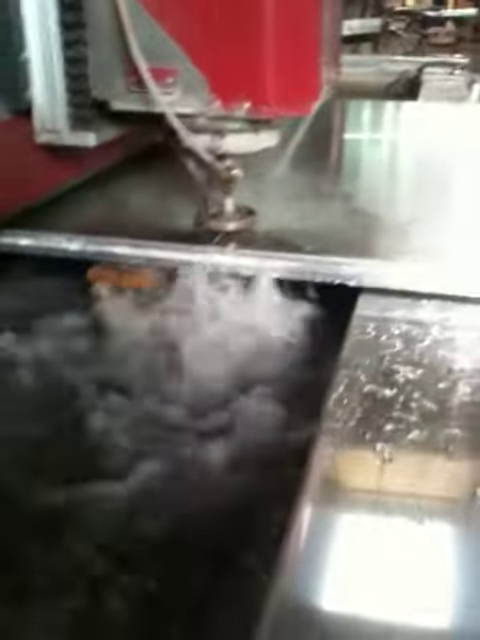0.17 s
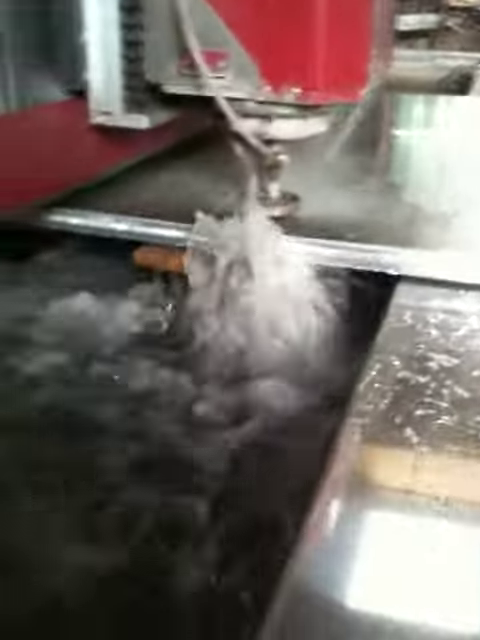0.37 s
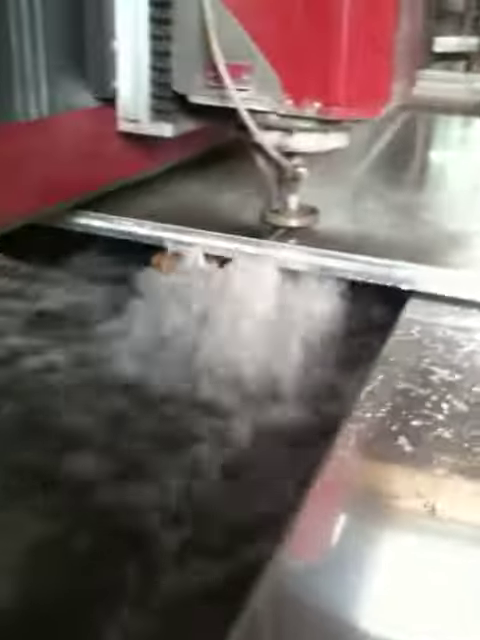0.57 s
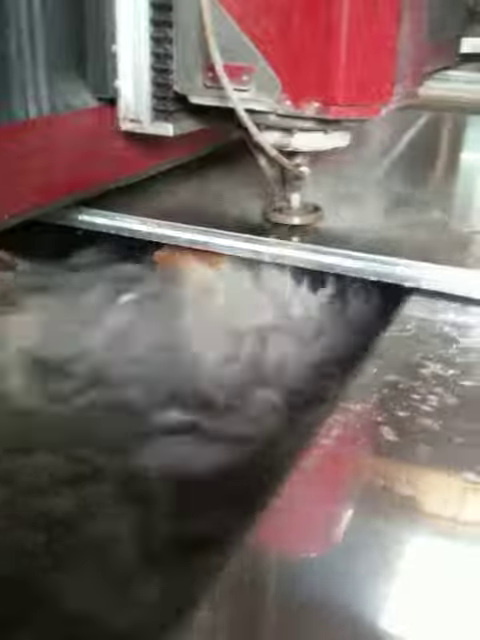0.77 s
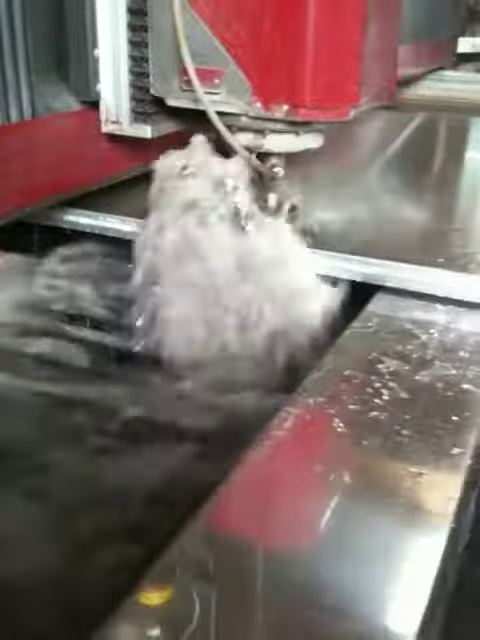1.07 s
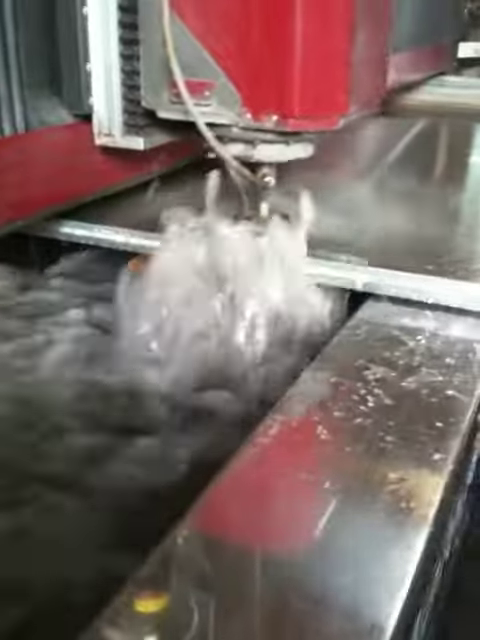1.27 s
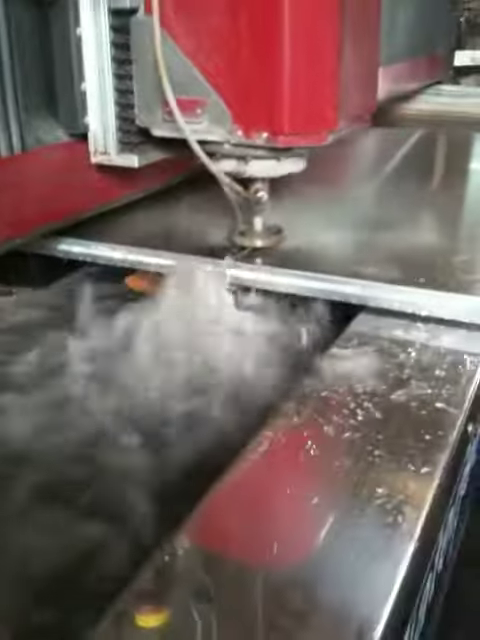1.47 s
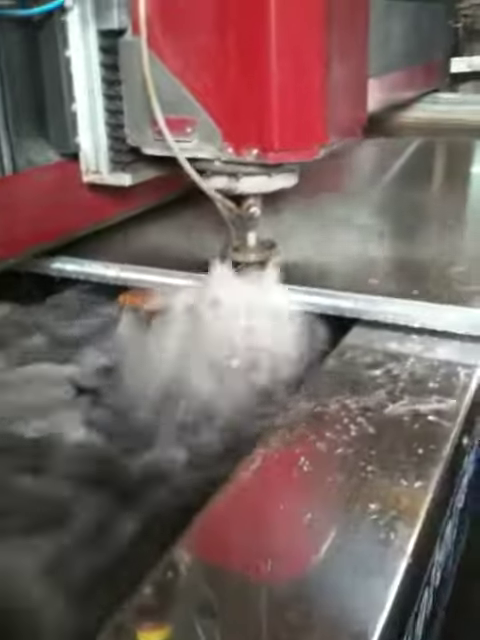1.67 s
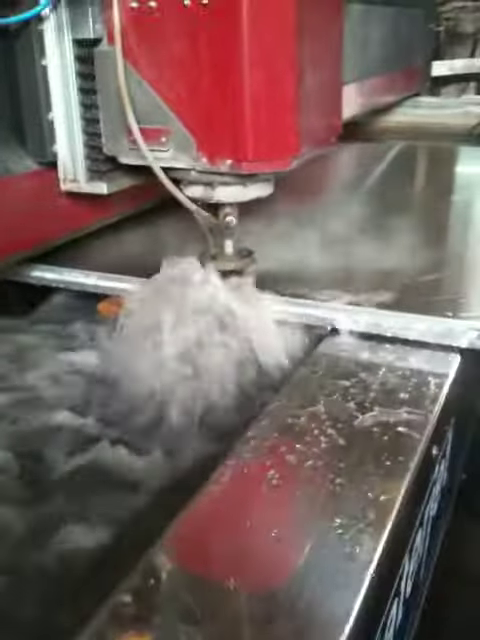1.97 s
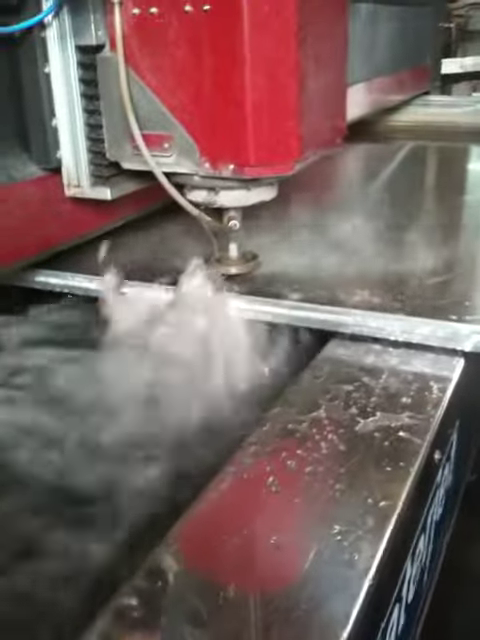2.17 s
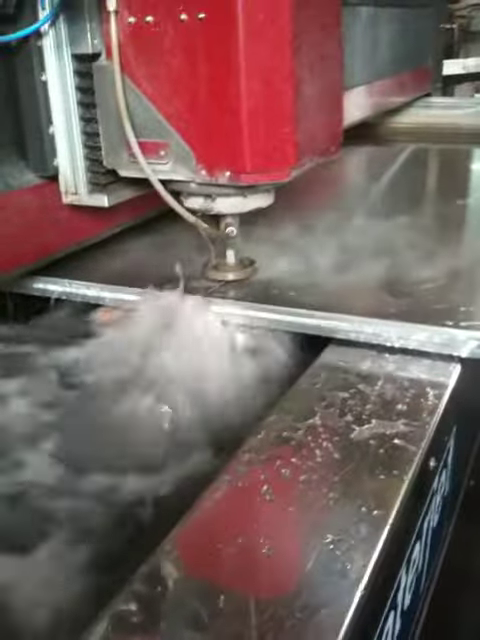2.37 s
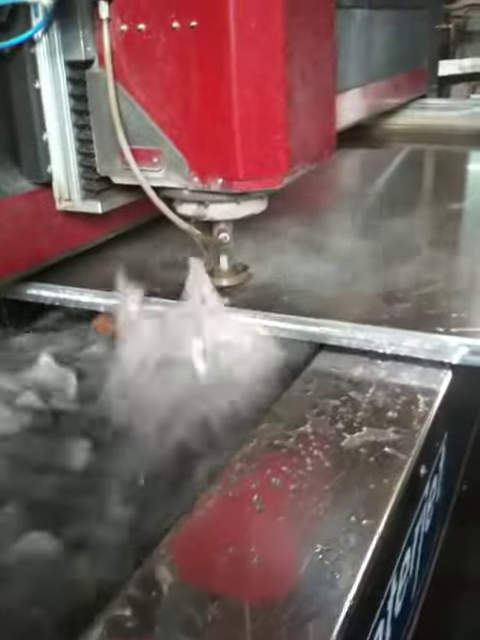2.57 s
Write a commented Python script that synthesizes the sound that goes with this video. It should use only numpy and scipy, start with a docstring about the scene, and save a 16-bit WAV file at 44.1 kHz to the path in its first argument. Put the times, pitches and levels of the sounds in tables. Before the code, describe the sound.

Close by in a workshop, a water jet cutter hisses sharply, surging twice with a slightly rough edge, then pulsing in shorter bursts. Beneath it, water fizzes and churns in the tank while a pump hums faintly.

```python
"""A bright hiss swells and sinks: a high-pressure water jet cuts metal sheet, louder as froth uncovers it.
Under it, spray sizzles and trapped air resonates, small pockets as whistles and large ones as gulps.
A low rushing partly swells with the hiss, the tank booms, and a pump's hum fades under the loud swells.
These swells overdrive the input of a nearby one-microphone camera, and the saturation roughens them."""
import sys
import numpy as np
from scipy import signal
from scipy.fft import rfft, irfft, next_fast_len
from scipy.io import wavfile
from scipy.ndimage import uniform_filter1d, map_coordinates

SR = 44100
rng = np.random.default_rng(int(sys.argv[2]) if len(sys.argv) > 2 else 0)


def materialize(psi):
    """Save the field psi as 16-bit PCM at rate SR to the path in sys.argv[1].

    A 1-D psi becomes a single channel; in a 2-D psi each row is a channel.
    """
    bounded = np.clip(np.atleast_2d(psi).T, -1, 1)
    quanta = np.round(bounded * 32767).astype(np.int16)
    wavfile.write(sys.argv[1], SR, quanta)


N = 119511

# Swells of the jet: t/s, hiss level/dB, spray level/dB, froth level/dB
JET_LEVELS = [(0, -15.5, -21, -22.5), (.12, -14, -22.5, -22), (.21, -11.5, -18.5, -24),
              (.28, -14.5, -19.5, -19.5), (.4, -12.5, -18, -18.5), (.56, -8, -15, -18),
              (.68, -5.5, -13, -15.5), (.8, -3.5, -14.5, -17.5), (.92, -5, -13.5, -19),
              (1.02, -6.5, -12, -15), (1.12, -9.5, -15, -19.5), (1.135, -8.5, -13, -18),
              (1.155, -17, -20.5, -21.5), (1.22, -14, -21, -23.5), (1.28, -19.5, -25.5, -24.5),
              (1.35, -17, -19, -22.5), (1.385, -14, -19.5, -18), (1.47, -13.5, -15.5, -19.5),
              (1.56, -4.5, -12, -16.5), (1.68, -5, -13, -15), (1.78, -8, -13, -17.5),
              (1.88, -14.5, -18.5, -22.5), (1.92, -11, -15, -18.5), (1.99, -16.5, -17.5, -17.5),
              (2.03, -18, -22, -20.5), (2.1, -15, -16.5, -19.5), (2.16, -12.5, -18.5, -18),
              (2.2, -8, -12, -18), (2.27, -12, -17.5, -17.5), (2.305, -16, -20.5, -21),
              (2.4, -7.5, -17, -21), (2.49, -14, -18, -20), (2.6, -7.5, -14, -18.5),
              (2.71, -14.5, -17.5, -18)]
# Spectra of the noise layers: f/Hz, relative spectral density/dB
HISS_SPECTRUM = [(4400, -23), (7500, -9), (9500, -4.5), (10500, -2), (12400, -1), (15200, -3.5), (18000, 0),
                 (22000, -9)]
SPRAY_SPECTRUM = [(3500, -27), (4800, -4), (6000, 0), (8000, -2.5), (9500, -0.5), (12000, -16)]
FROTH_SPECTRUM = [(1700, -17), (2400, -6.5), (2750, -1.5), (2950, -3.5), (3200, -1), (3500, -1),
                  (3850, -3.5), (4700, -1.5), (6000, -13.5)]
LOW_RUSH_SPECTRUM = [(250, -14), (340, -12), (520, -2.5), (750, -9.5), (1150, -5.5), (1700, -9),
                     (2400, -10), (3200, -13)]
BOOM_SPECTRUM = [(100, -11.5), (150, -5.5), (185, -4.5), (220, -6.5), (265, -3.5), (330, -11), (420, -11.5)]
# Ringing air pockets, small and large: t/s, f/Hz, level/dB, length/s
WHISTLE_POCKETS = [(0.042, 2750, -18.5, 0.034), (.18, 2800, -16, 0.016), (0.231, 4766, -15, 0.013),
                   (0.337, 5340, -20, .02), (0.47, 3700, -14, 0.017), (0.532, 2590, -18.5, 0.03),
                   (.56, 4330, -11, 0.017), (0.568, 3900, -16, 0.024), (0.609, 3274, -8, 0.022),
                   (.655, 2920, -16, 0.024), (0.708, 4260, -13, 0.031), (0.72, 5950, -8, .02),
                   (0.822, 5150, -18, 0.013), (0.883, 6660, -16, 0.015), (.9, 5500, -8, 0.015),
                   (1.052, 2730, -14.5, 0.048), (1.075, 2690, -19, 0.033), (1.113, 6600, -11, 0.021),
                   (1.375, 3390, -20.5, 0.069), (1.384, 4740, -17, 0.011), (1.4, 3980, -16, 0.026),
                   (1.43, 3100, -19.5, 0.035), (1.49, 3610, -15, 0.027), (1.593, 3300, -14, 0.027),
                   (1.599, 5470, -7, 0.026), (1.715, 3540, -15, 0.021), (1.91, 8200, -18, 0.015),
                   (1.938, 1880, -23.5, 0.05), (1.947, 2700, -16, 0.031), (1.977, 3400, -19, 0.044),
                   (2.05, 2610, -21, 0.026), (2.19, 4500, -17, 0.04), (2.387, 2790, -17, 0.047),
                   (2.449, 2700, -16.5, 0.025), (2.678, 2756, -17.5, 0.031), (2.69, 1080, -21, 0.035)]
GULP_POCKETS = [(0.0, 187, -30, 0.038), (.1, 188, -29, 0.056), (.285, 180, -27.5, 0.069),
                (.375, 202, -30, 0.025), (.42, 172, -23, 0.047), (.585, 256, -28, .05),
                (1.12, 175, -27, 0.097), (1.34, 259, -28, 0.043), (1.75, 244, -29, 0.059),
                (1.955, 172, -29, 0.055), (2.145, 193, -26, 0.079), (2.22, 173, -25.5, 0.048),
                (2.39, 264, -29, 0.054), (2.445, 187, -27, 0.059)]
# Low background: t/s, level of the strongest hum line/dB, level of the tank's boom/dB
HUM_AND_BOOM_LEVELS = [(0, -32, -34), (.12, -42, -32.5), (.3, -44.5, -34), (.45, -35, -32), (.55, -42, -38),
                       (.7, -32.5, -38), (.82, -55, -51), (1.0, -51, -42), (1.07, -36, -43),
                       (1.15, -35.5, -32.5), (1.25, -35.5, -35.5), (1.36, -31.5, -34), (1.5, -34.5, -35.5),
                       (1.6, -43, -35), (1.7, -38, -34), (1.75, -31.5, -42.5), (1.95, -32, -32),
                       (2.15, -36.5, -34), (2.25, -38.5, -33.5), (2.38, -44, -38), (2.45, -33.5, -33.5),
                       (2.6, -36, -34.5), (2.71, -38, -33)]
# Weaker lines of the pump: f/Hz, rms level/dB
WEAK_HUM_LINES = [(182, -45.5), (269.2, -46), (1120, -46.5)]

GURGLE_DB, GURGLES_PER_S = 1.03, 34  # clumping of spray and froth


def jet(level_db):
    """Turbulence in the fast jet radiates broadband noise, heard as a high hiss."""
    return amp(level_db + 0.36 * quiver(31.96)) * rush(HISS_SPECTRUM, patchy_db=2.5, patch_hz=299)


def spray(level_db):
    """Countless droplet impacts add incoherently to a sizzle that comes in clumps."""
    gurgle_db = GURGLE_DB * quiver(GURGLES_PER_S)
    return amp(level_db + gurgle_db) * rush(SPRAY_SPECTRUM, patchy_db=2.5, patch_hz=250)


def froth(level_db):
    """Overlapping bubble resonances merge into a band of noise, with single bubbles ringing in it."""
    gurgle_db = GURGLE_DB * quiver(GURGLES_PER_S)
    fizz = rush(FROTH_SPECTRUM, patchy_db=1.0, patch_hz=200) + amp(-5) * bubbles()
    return amp(level_db + gurgle_db) * unit(fizz)


def bubbles(per_s=420, median_hz=4207, log_spread=0.26, cycles=64.4, rise=0.031):
    """Each bubble is a damped oscillator, air as spring and water as mass, rising slightly in pitch."""
    count = int(per_s * N / SR)
    onset, size_rank = rng.random((2, count, 1))
    hz = median_hz * np.exp(log_spread * rng.standard_normal((count, 1)))
    samples = np.arange(1500)
    age = samples / SR * hz / cycles
    tones = age * np.exp(-4 * age) * np.sin(2 * np.pi * cycles * age * (1 + rise * age))
    tones *= amp(-2.5 * np.log(size_rank + 0.0018))  # many faint, a few loud
    positions = (onset * N).astype(int) + samples
    return unit(np.bincount(positions.ravel(), tones.ravel())[:N])


def air_pockets(rows, roughness, attack_share=0.14):
    """Air squeezed by the jet resonates, lower in larger pockets; random modulation makes it hoarse."""
    out = np.zeros(N + SR)
    for start, hz, db, length in rows:
        t = np.arange(int(2 * length * SR)) / SR
        knots = rng.standard_normal(24) + 1j * rng.standard_normal(24)
        modulation = 1 + roughness * np.interp(t / length, np.linspace(0, 2, 24), knots)
        tone = np.imag(modulation * np.exp(2j * np.pi * hz * t)) / np.hypot(1, roughness)
        envelope = np.minimum(t / (attack_share * length), 1) * np.exp(-1.8 * (t / length) ** 2)
        out[int(start * SR):][:len(t)] += amp(db) * envelope * tone
    return out[:N]


def low_rush_and_boom(hiss_db, boom_db):
    """Amplitude-modulated noise: a low rushing that partly swells with the hiss, and a boom."""
    swing_db = 0.27 * (hiss_db - hiss_db.mean())
    low_rush = amp(-27.5 + swing_db + 0.84 * wobble(17)) * rush(LOW_RUSH_SPECTRUM, patchy_db=3.0)
    boom = amp(boom_db) * rush(BOOM_SPECTRUM, patchy_db=2.0)
    return low_rush + boom


def pump(main_db, main_hz=537, drift_hz=3):
    """Periodic motion gives a line spectrum; the lines drift together in pitch and waver apart in level."""
    t = np.arange(N) / SR
    drift_phase = 2 * np.pi * np.cumsum(drift_hz * wobble(20)) / SR
    line = lambda hz: np.sqrt(2) * np.sin(2 * np.pi * hz * t + drift_phase * hz / main_hz)
    weak = sum(amp(db + 4.5 * wobble(8.13)) * line(hz) for hz, db in WEAK_HUM_LINES)
    return weak + amp(main_db + 2 * wobble(25.02)) * line(main_hz)


def rush(spectrum, patchy_db, patch_hz=170):
    """Spectral shaping: coloured noise of rms 1, its gain varying in patches of time and frequency."""
    spectra = signal.stft(rng.standard_normal(N), nperseg=1024)[2]
    patches = uniform_filter1d(rng.standard_normal(spectra.shape), int(patch_hz * 1024 / SR) + 1, axis=0)
    patches = uniform_filter1d(patches, size=3, axis=1)
    noise = signal.istft(spectra * amp(patchy_db * unit(patches)), nperseg=1024)[1][:N]
    f, db = np.transpose(spectrum)
    return unit(filtered(noise, lambda hz: amp(np.interp(np.log(hz + 1), np.log(f), db, -120, -120))))


def wobble(rate):
    """Spline interpolation through random knots, rate of them a second."""
    return map_coordinates(rng.standard_normal(400), [np.arange(N) * rate / SR])


def quiver(rate, mean_s=0.13):
    """Subtracting its running mean leaves the fast part of a wobble."""
    curve = wobble(rate)
    return curve - uniform_filter1d(curve, int(mean_s * SR))


def curves(rows):
    """Linear interpolation of each column after the time, one value per sample."""
    times, *columns = np.transpose(rows)
    return [np.interp(np.arange(N) / SR, times, column) for column in columns]


def filtered(x, response):
    """Linear filtering multiplies the spectrum by a frequency response."""
    size = next_fast_len(N + 8192)
    return irfft(rfft(x, size) * response(np.fft.rfftfreq(size, 1 / SR)), size)[..., :N]


def amp(db):
    """Amplitude ratio of a level in dB."""
    return 10 ** (np.asarray(db) / 20)


def unit(x):
    """Normalisation to rms 1."""
    return x / np.sqrt(np.mean(x ** 2) + 1e-20)


def scene():
    """Superposition at one microphone; jet, spray and froth share one flutter."""
    hiss_db, spray_db, froth_db = curves(JET_LEVELS)
    hum_db, boom_db = curves(HUM_AND_BOOM_LEVELS)
    flutter = amp(0.5 * quiver(30.08))
    water = flutter * (jet(hiss_db) + spray(spray_db) + froth(froth_db))
    low_noise = low_rush_and_boom(hiss_db, boom_db)
    whistles = air_pockets(WHISTLE_POCKETS, roughness=0.75)
    gulps = air_pockets(GULP_POCKETS, roughness=0.15)
    return np.tile(water + low_noise + whistles + gulps + pump(hum_db), (2, 1))


def record(dry, bass_hz=120, ceiling=0.69, hardness=4.2, low_hz=36, top_hz=15780):
    """Nonlinear distortion: after a bass roll-off the input rounds the peaks, then the band is limited."""
    thinned = filtered(dry, lambda hz: (hz / bass_hz) ** 4 / (1 + (hz / bass_hz) ** 4))
    saturated = thinned / (1 + np.abs(thinned / ceiling) ** hardness) ** (1 / hardness)
    return np.clip(filtered(saturated, lambda hz: (hz < top_hz) * hz / np.hypot(hz, low_hz)), -1, 1)


dry = scene()
out = record(dry)
materialize(out)
```